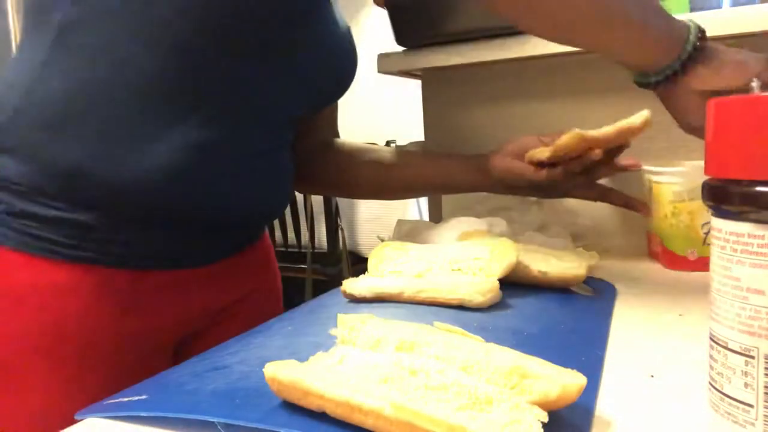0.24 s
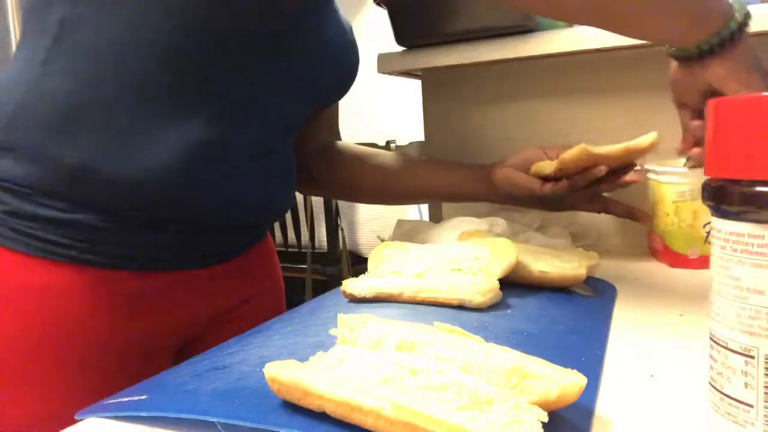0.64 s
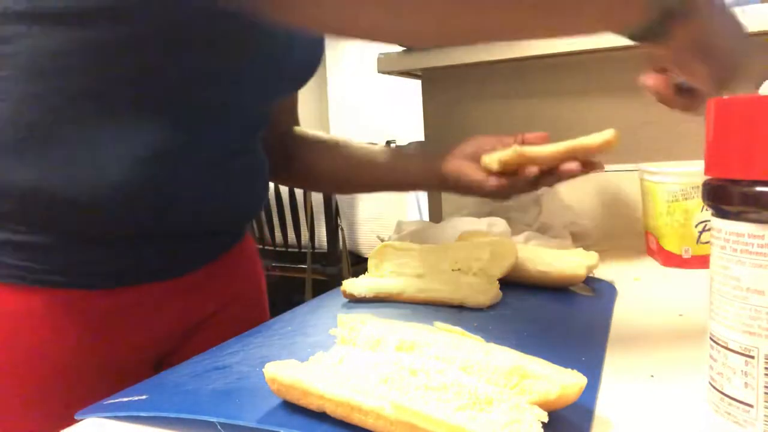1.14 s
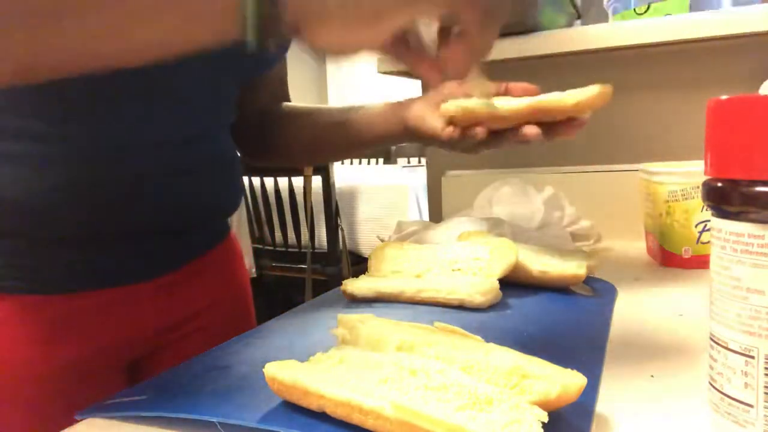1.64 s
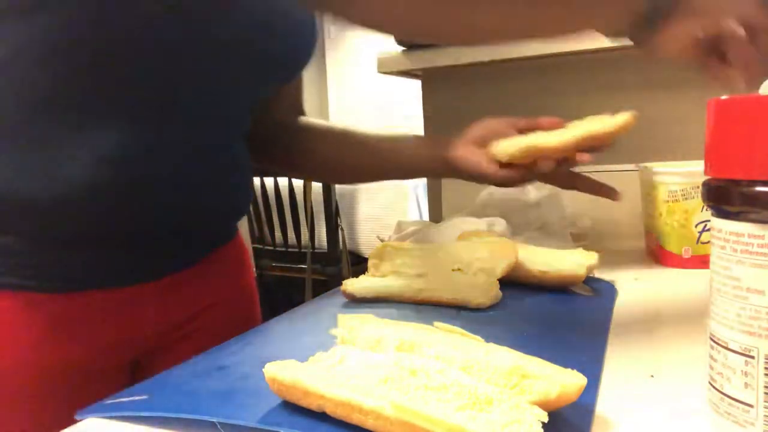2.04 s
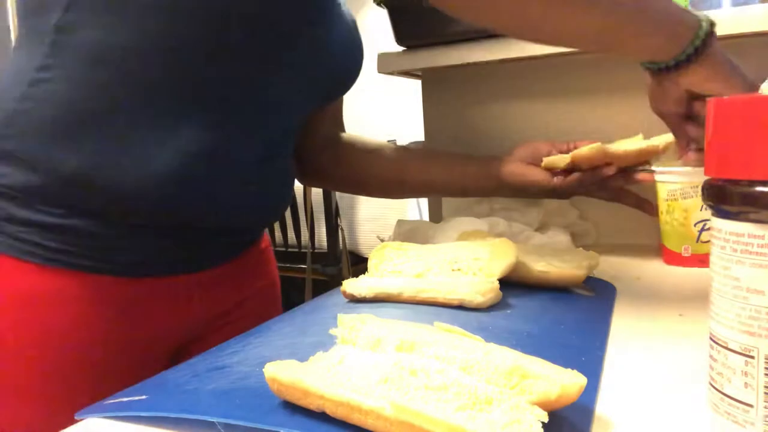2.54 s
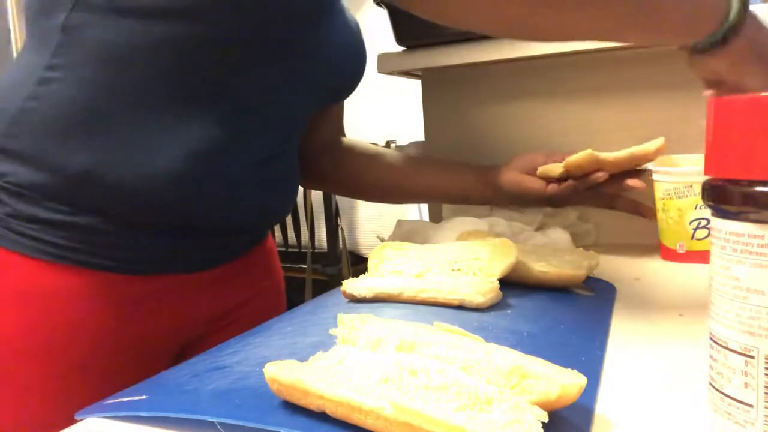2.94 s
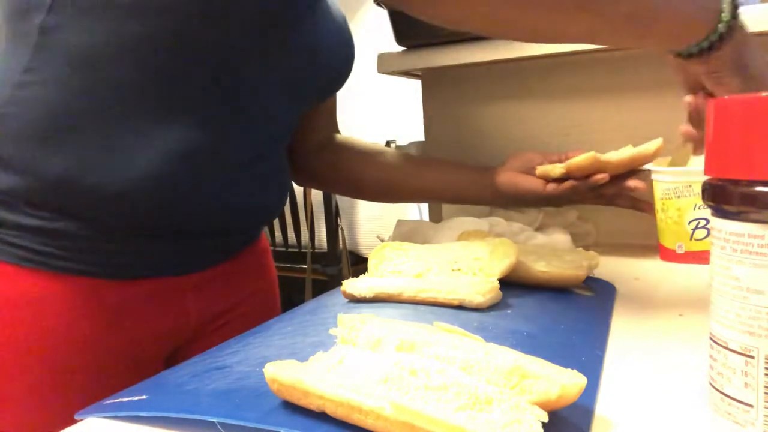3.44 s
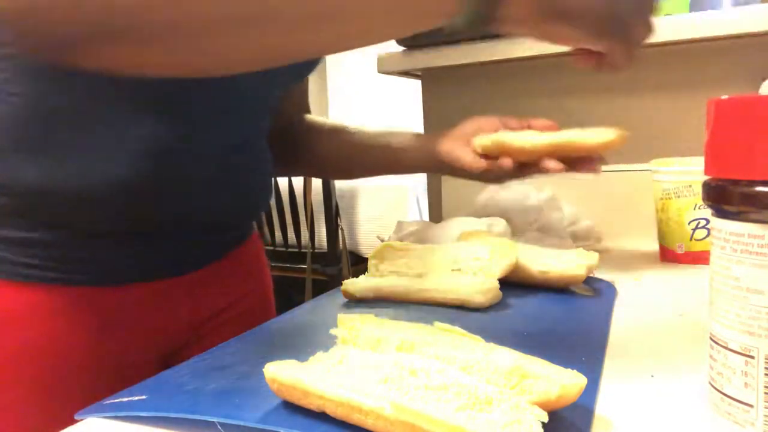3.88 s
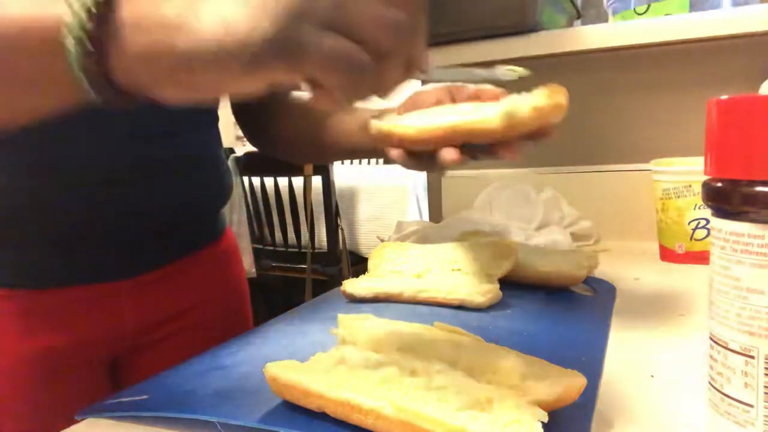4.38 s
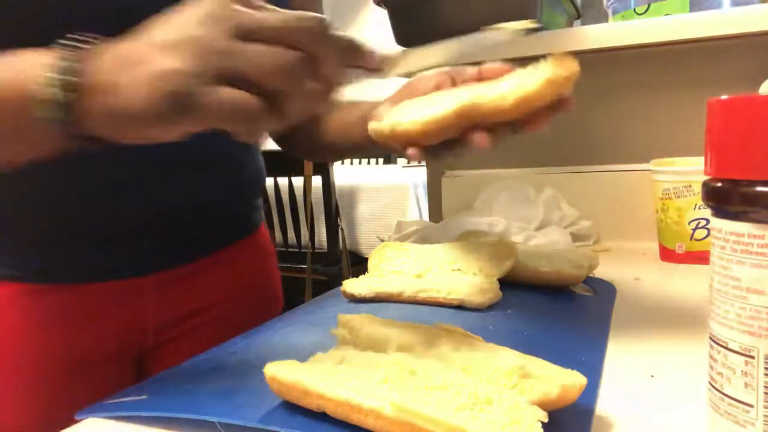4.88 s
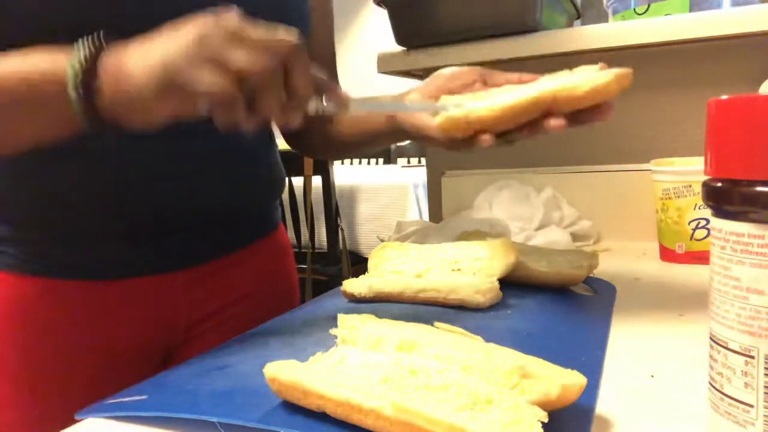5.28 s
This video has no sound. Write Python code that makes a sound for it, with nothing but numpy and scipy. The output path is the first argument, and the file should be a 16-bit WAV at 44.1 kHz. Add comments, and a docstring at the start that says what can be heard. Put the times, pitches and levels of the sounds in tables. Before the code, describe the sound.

In a small hard kitchen, a knife raps and scrapes a plastic butter tub for about a second. Only tiny bead ticks follow, then a second run of knocks and scrapes from two to three and a half seconds. The end is quiet, with very faint smearing strokes. A refrigerator hums low throughout, heard by a close small microphone.

```python
"""Table knife in a butter tub

A table knife digs butter out of a plastic tub: knocks ring the tub's modes under a noise crack, scrapes are
grainy filtered noise, counter thuds are low modes. A bead bracelet ticks with short tones and noise puffs;
once a thin tone squeaks. A refrigerator hums (sines) and whirs (shaped noise) in a small hard room.
"""
import sys
import numpy as np
from scipy import signal
from scipy.fft import rfft, irfft, next_fast_len
from scipy.io import wavfile
from scipy.ndimage import uniform_filter1d, map_coordinates

SR = 44100
rng = np.random.default_rng(int(sys.argv[2]) if len(sys.argv) > 2 else 0)


def to_wav(s):
    """Save 16-bit WAV."""
    ch = np.atleast_2d(s).T  # columns
    pcm = np.round(np.clip(ch, -1, 1) * 32767)  # PCM
    wavfile.write(sys.argv[1], SR, pcm.astype(np.int16))


N = 243208
T = np.arange(N) / SR

# refrigerator hum: multiple of mains, level/dB rms
HUM_HARMONICS = [(1, -62.5), (2, -47), (4, -52.5), (6, -69)]
# fan tone level over time: t/s, level/dB rms
FAN_LEVEL = [(0, -55.5), (2, -69), (3, -59.5), (4.4, -55), (5.51, -56)]
# whir spectrum: f/Hz, relative density/dB
WHIR_SPECTRUM = [(20, -59), (40, -11.5), (70, -5.5), (100, -14), (170, -7.5), (280, -7.5), (420, -21.5),
                 (700, -20.5), (1300, -19), (1900, -25), (3500, -29), (7400, -36), (8600, -40.5),
                 (16000, -43.5)]
# cabinet resonances in the whir: f/Hz, half-width/Hz, gain/dB
CABINET_RESONANCES = [(487, 31, 9.5), (684, 72, 9), (863, 9.7, 9.5), (1033, 67, 5), (1200, 15, 6)]
MAINS_HZ, FAN_HZ = 60.16, 172.5
WHIR_MID_DB = -59.5  # rms, 400-2500 Hz

# knife against tub: t/s, then relative: thud level/dB, body level/dB, body f/Hz, click level/dB, sizzle level/dB
KNOCKS = [(0.112, -75, -24, 1430, -28, -43), (0.1157, -31, -14, 782, -48, -58),
          (0.1867, -52, -18, 1270, -30, -40), (.198, -28.5, -44, 837, -39, -39),
          (0.2019, -26, -12, 875, -29.5, -35.5), (0.2308, -34, -28, 851, -43, -56),
          (0.2797, -42, -38, 950, -57, -49), (.357, -38.5, -28, 477, -47.5, -49),
          (0.394, -63, -54, 452, -46, -58), (0.403, -31, -29, 615, -51, -54),
          (0.416, -36, -29, 750, -66, -56), (0.5436, -52, -42, 834, -46, -54),
          (.615, -35, -26.5, 855, -35, -49), (.72, -51, -44, 474, -64, -60),
          (0.9233, -46, -18, 1300, -31.5, -38), (0.9249, -25, -8, 970, -34, -64),
          (.9634, -55, -34, 888, -49, -63), (2.1427, -36.5, -25.5, 555, -32, -42),
          (2.163, -55, -52, 595, -46, -52), (2.174, -38, -20.5, 600, -64, -63),
          (2.191, -46, -45, 484, -36, -49), (2.202, -20, -13, 615, -34.5, -51),
          (2.215, -37, -37, 485, -45, -59), (2.241, -58, -26, 930, -51, -57),
          (2.2494, -46, -49, 886, -42, -46.5), (2.3112, -72, -27, 840, -43.5, -46.5),
          (2.363, -42, -64, 940, -45, -51), (2.46, -42, -39, 463, -50, -38),
          (2.593, -42, -29.5, 590, -67, -65), (2.6839, -45.5, -30, 870, -35, -47),
          (2.7234, -56, -29, 614, -48, -49), (2.7408, -40.5, -35.5, 880, -29.5, -52.5),
          (3.0657, -43, -27, 560, -38, -52.5), (3.1317, -46, -22, 835, -37, -43.5),
          (3.147, -37, -28, 990, -19.5, -39), (3.167, -62, -31.5, 495, -56, -60),
          (3.3, -55, -40, 917, -65, -65), (3.395, -63, -45, 820, -51.5, -54),
          (3.509, -43.5, -38.5, 640, -51, -80)]
# tub wall modes: f/Hz, relative level/dB, t60/s
TUB_MODES = [(156, -6, 0.11), (200.6, -2.5, 0.15), (274.6, 7.5, 0.11), (333.4, -3, 0.13), (396, -3, 0.075),
             (498.4, 1, 0.032), (607, -6.5, 0.051), (750, -4, 0.026), (829, -2, 0.032), (971, -3.5, 0.022),
             (1183, -6.5, 0.024), (1450, -7, 0.022), (1837, -10, 0.042), (2015, -7.5, 0.028),
             (2350, -6, 0.0053), (2700, -8, 0.015), (3686, -5, 0.023)]
THUD_HZ, CLICK_HZ, SIZZLE_HZ = 260, 2470, 6500
TOP_REL_DB = -20  # 16 kHz relative to sizzle

# tub rocking on the counter: t/s, relative level/dB
THUMPS = [(.13, -44), (.222, -47), (0.421, -52), (.942, -41), (2.21, -36), (2.351, -47), (2.72, -49),
          (3.162, -50)]
# counter modes: f/Hz, relative level/dB, t60/s
COUNTER_MODES = [(59.3, -2, 0.083), (70.4, 2.5, 0.22), (88.8, 11, 0.23)]

# blade dragging on the tub wall: start t/s, length/s, dull level/dB, bright level/dB
STROKES = [(0.172, 0.2, -47.5, -54), (0.491, 0.082, -59, -61.5), (0.553, 0.082, -52, -68),
           (0.591, 0.15, -53, -63), (0.778, 0.17, -57.5, -68.5), (1.123, 0.054, -62, -64.5),
           (2.155, 0.23, -51, -61.5), (2.285, 0.33, -54.5, -61.5), (2.42, 0.044, -72, -49),
           (2.517, 0.36, -56, -71), (2.688, 0.11, -54, -69), (3.105, 0.12, -48.5, -62),
           (3.286, 0.23, -61.5, -65.5), (4.082, 0.22, -72, -80), (4.293, 0.063, -71, -71),
           (4.497, 0.25, -61.5, -72), (4.903, 0.31, -66.5, -76)]
BITE_SHARE, EASE_DB = 0.29, 25.5  # blade bites in over this share of a stroke, then eases off by this much

# bead on bead: t/s, relative level/dB, f/Hz
BEADS = [(1.274, -63, 3220), (1.3518, -66, 3140), (1.412, -57, 3070), (1.4435, -59, 3140),
         (1.5199, -64.5, 4440), (1.546, -61, 3150), (1.5646, -58, 3200), (1.633, -54.5, 3850),
         (1.696, -55.5, 2050), (1.7244, -62, 2200), (1.7984, -56.5, 3520), (1.972, -56.5, 2900),
         (2.028, -61, 5700), (2.5844, -67, 1820), (2.6616, -50, 1850), (2.8325, -65, 3340),
         (3.017, -57, 3000), (3.2865, -55.5, 2360), (3.3294, -60, 3570), (3.6077, -63, 3220),
         (3.7, -65, 3060), (3.945, -64.5, 3680), (4.1026, -64, 3100), (4.11, -68, 4900), (4.14, -59, 2320),
         (4.1619, -60, 3910), (4.2495, -55, 3050), (4.306, -65, 3230), (4.4276, -64, 3020),
         (4.8735, -60.5, 3260), (4.9262, -64, 3080), (4.9706, -64, 4830), (5.0414, -59.5, 3070),
         (5.046, -58, 1830), (5.331, -69, 5050), (5.44, -66, 4840)]
# treble ticks: t/s, relative level/dB, centre f/Hz
TICKS = [(.279, -50, 7050), (1.1594, -56, 11100), (1.4686, -56, 7160), (1.5618, -57, 7390),
         (1.584, -58, 10400), (1.6192, -52, 7290), (1.6344, -55, 7880), (1.7205, -59, 7060),
         (1.786, -56.5, 12000), (1.8994, -54, 6800), (1.9325, -59, 13500), (2.0607, -58, 7700),
         (2.1161, -58, 8640), (3.3272, -59, 8000), (4.104, -54.5, 10700), (4.211, -58, 7400),
         (4.554, -62, 7440), (4.8529, -61, 12900), (5.0393, -56.5, 7800), (5.1454, -61, 11100),
         (5.4819, -55, 7280)]
BEAD_T60_S, TICK_T60_S = 0.044, 0.04

# one thin tone: t/s, length/s, f/Hz, peak level/dB before wobble
SQUEAK = (4.445, .08, 1350, -58)

# room decay: f/Hz, t60/s
ROOM_DECAY = [(100, 0.55), (1000, 0.16), (4000, 0.38), (12000, 0.15)]
MIC_TOP_HZ, MIC_BASS_HZ = 15900, 50


def amp(db):
    """Gain of a level in dB."""
    return 10 ** (np.asarray(db) / 20)


def unit(x):
    """Scaled to rms 1."""
    return x / np.sqrt(np.mean(x ** 2) + 1e-20)


def along(points, hz):
    """(Hz, value) points read on a log-frequency axis."""
    f, v = np.transpose(points)
    return np.interp(np.log(hz + 1), np.log(f + 1), v)


def wobble(rate_hz):
    """Smooth random curve, rate_hz knots a second."""
    knots = rng.standard_normal(int(N * rate_hz / SR) + 4)
    return map_coordinates(knots, [T * rate_hz])


def filtered(x, response):
    """x through a complex response of frequency."""
    m = next_fast_len(len(x) + 8192)
    return irfft(rfft(x, m) * response(np.fft.rfftfreq(m, 1 / SR)), m)[:len(x)]


def dying(decay, size):
    """Noise in which each frequency dies at its own t60."""
    hz, t, z = signal.stft(rng.standard_normal(size), SR, nperseg=128)
    t60_s = along(decay, hz)[:, None]
    return signal.istft(z * amp(-60 * t / t60_s), SR, nperseg=128)[1][:size]


def patchy(depth_db, bins, frames):
    """Noise with patches of random gain in time and frequency."""
    z = signal.stft(rng.standard_normal(N), nperseg=256)[2]
    field = uniform_filter1d(rng.standard_normal(z.shape), bins, axis=0)
    field = uniform_filter1d(field, frames, axis=1)
    return signal.istft(z * amp(depth_db * unit(field)), nperseg=256)[1][:N]


def puff(hz, width, size):
    """Noise in a narrow band, rms 1; width is a share of hz."""
    noise = rng.standard_normal(size)
    return unit(filtered(noise, lambda f: 1 / (1 + ((f - hz) / (width * hz)) ** 2)))


def add(track, s, sound):
    """Mixes a sound in at time s."""
    track[round(s * SR):][:len(sound)] += sound


def refrigerator():
    """Mains-locked hum, a wavering fan tone and a patchy whir of air coloured by cabinet resonances."""
    hum = np.zeros(N)
    for k, db in HUM_HARMONICS:
        phase = 2 * np.pi * k * MAINS_HZ * T + 0.12 * wobble(2.96)
        hum += amp(db + 0.17 * wobble(6)) * np.sin(phase)

    fan_db = np.interp(T, *np.transpose(FAN_LEVEL)) + 1.2 * wobble(16)
    fan_phase = 2 * np.pi * np.cumsum(FAN_HZ + 1.47 * wobble(1.5)) / SR
    fan = amp(fan_db) * np.sin(fan_phase)

    def whir_response(f):
        peaks_db = sum(db / (1 + ((f - c) / w) ** 2) for c, w, db in CABINET_RESONANCES)
        return amp(along(WHIR_SPECTRUM, f) + peaks_db)

    air = filtered(patchy(2.0, 3, 16), whir_response)
    middle = filtered(air, lambda f: (f > 400) & (f < 2500))
    return np.sqrt(2) * (hum + fan) + amp(WHIR_MID_DB) * air / np.std(middle)


def knocks():
    """Each blow rings the modes at new strengths; bending waves bring the treble first and the bass late."""
    out, t = np.zeros(N + SR), np.arange(SR // 5) / SR
    hz, level_db, t60_s = np.transpose(TUB_MODES)[:, :, None]
    delay_s = (0.1498 / np.sqrt(hz) - .002).clip(0, .005)
    late = np.maximum(t - delay_s, 0)
    for s, thud_db, body_db, body_hz, click_db, sizzle_db in KNOCKS:
        # where the blade lands sets the strongest modes
        colour = [(THUD_HZ, thud_db), (body_hz, body_db), (CLICK_HZ, click_db),
                  (SIZZLE_HZ, sizzle_db), (16000, sizzle_db + TOP_REL_DB)]
        luck_db = 2 * rng.standard_normal(hz.shape)
        detune = .015 * rng.standard_normal(hz.shape)
        size = amp(along(colour, hz) + level_db + luck_db - 60 * late / t60_s)
        size *= 1 - np.exp(-late * hz * 4)
        size *= .6 + 1.2 * np.exp(-late / .005)  # the blade damps the wall while it stays in contact
        ring = np.sum(size * np.sin(2 * np.pi * hz * (1 + detune) * late), axis=0)

        crack = dying([(300, 0.2), (1500, 0.015), (5000, 0.051), (14000, 0.024)], size=len(t))
        crack_colour = [(150, -87)] + colour
        crack = filtered(crack, lambda f: amp(along(crack_colour, f)) * np.minimum(f / 1500, 1))
        add(out, s, amp(-3.5) * ring + amp(5) * crack)
    return filtered(out[:N], lambda f: (1j * f / (1j * f + 110)) ** 2)  # the knocks carry no deep bass


def thumps():
    """The rocking tub's soft pushes set off the lowest modes of the counter."""
    out, t = np.zeros(N + SR), np.arange(SR // 3) / SR
    for s, db in THUMPS:
        ring = np.zeros(len(t))
        for hz, level_db, t60_s in COUNTER_MODES:
            mode_db = level_db + rng.normal(0, 1.1) - 60 * t / t60_s
            ring += amp(mode_db) * np.sin(2 * np.pi * hz * t)
        add(out, s, amp(db) * (1 - np.exp(-t / 0.018)) * ring)
    return out[:N]


def scrape():
    """Dense uneven grains of friction, catching at one pitch and then another, in a dull and a bright layer."""
    gain = np.zeros((2, N))
    for s, length_s, *level_db in STROKES:
        shape = np.interp((T - s) / length_s, [0, BITE_SHARE, 1], [0, 1, amp(-EASE_DB)], right=0)
        gain += amp(level_db)[:, None] * shape
    dull_grit, bright_grit = [amp(2.5 * wobble(900)) * patchy(3.5, 6, 3) for _ in gain]
    # f/Hz, relative level/dB
    dull_colour = [(200, -1), (600, 8), (2000, 2), (4000, -5), (6000, -23.5), (9000, -98)]
    bright_colour = [(4000, -12), (6500, -5.0), (10000, -13.5), (13500, -13.5), (16000, -20)]
    dull = filtered(dull_grit, lambda f: amp(along(dull_colour, f)))
    bright = filtered(bright_grit, lambda f: amp(along(bright_colour, f)))
    return gain[0] * unit(dull) + gain[1] * unit(bright)


def bracelet():
    """Beads ring briefly at one pitch each, with a rough edge; the treble ticks are puffs of narrow noise."""
    out, t = np.zeros(N + SR), np.arange(SR // 8) / SR
    for s, db, hz in BEADS:
        envelope = amp(db - 60 * t / BEAD_T60_S) * (1 - np.exp(-t / 0.00027))
        tone = np.sin(2 * np.pi * hz * t) * np.cos(rng.uniform(60, 190) * t)
        add(out, s, envelope * (tone + 1.74 * puff(hz, 0.083, len(t))))

    # fainter ticks fall anywhere: -84 to -76 dB, 4 to 15 kHz
    stray = rng.random((45, 3)) * [N / SR, 8, 11000] + [0, -84, 4000]
    for s, db, hz in [*TICKS, *stray]:
        envelope = amp(db - 60 * t / TICK_T60_S) * (1 - np.exp(-t / 0.0029))
        add(out, s, envelope * puff(hz, 0.28, len(t)))
    return out[:N]


def squeak():
    """A brief tone, unsteady in level and phase."""
    s, length_s, hz, db = SQUEAK
    swell = np.sin(np.pi * np.clip((T - s) / length_s, 0, 1)) ** .5
    return amp(db + 4.2 * wobble(60)) * swell * np.sin(2 * np.pi * hz * T + 0.56 * wobble(50))


def room(x):
    """Diffuse tail of decaying noise, drawn anew every quarter second so that no one draw colours the whole."""
    out, hop = np.zeros(N + SR), 11025
    for k in range(0, N, hop):
        tail = dying(ROOM_DECAY, size=SR // 2)
        echo = signal.fftconvolve(x[k:k + hop], tail / np.linalg.norm(tail))
        add(out, k / SR + .007, echo)
    return out[:N]


def scene():
    """Hand sounds with their echo, counter thuds and the refrigerator."""
    near = knocks() + scrape() + squeak()
    beads = bracelet()
    echo = room(amp(-9.5) * near + amp(-5.5) * beads)
    return (near + beads + echo + thumps() + refrigerator())[None]


def record(dry):
    """A small microphone that drops the deep bass and keeps nothing above its band limit."""
    return filtered(dry[0], lambda f: (f < MIC_TOP_HZ) * (1j * f / (1j * f + MIC_BASS_HZ)) ** 2)[None]


dry = scene()
out = record(dry)
to_wav(out)
```